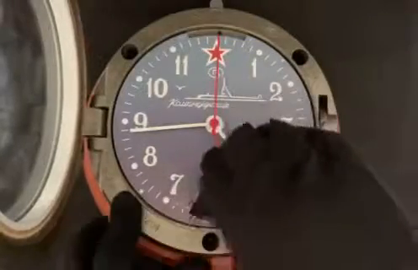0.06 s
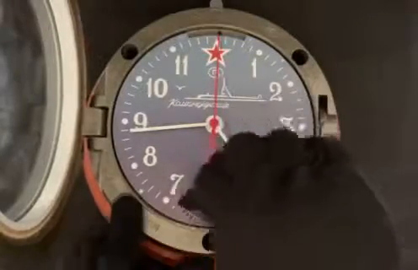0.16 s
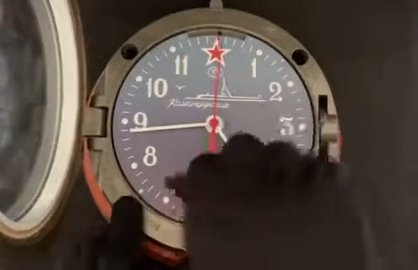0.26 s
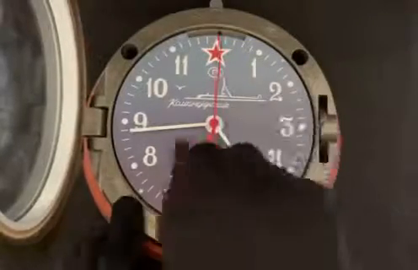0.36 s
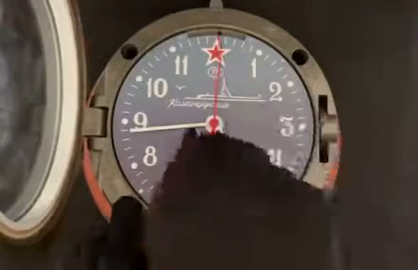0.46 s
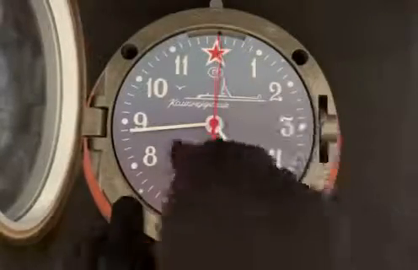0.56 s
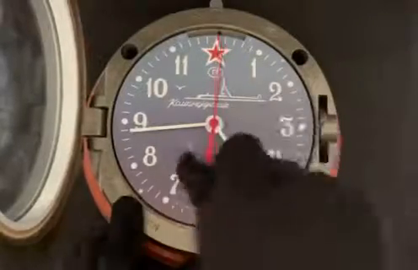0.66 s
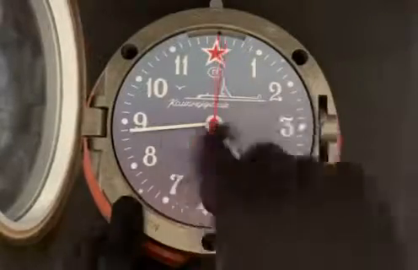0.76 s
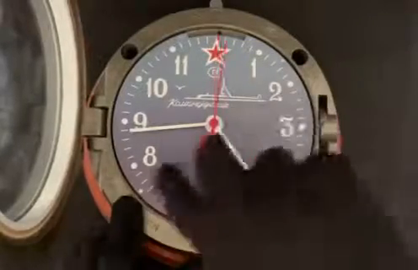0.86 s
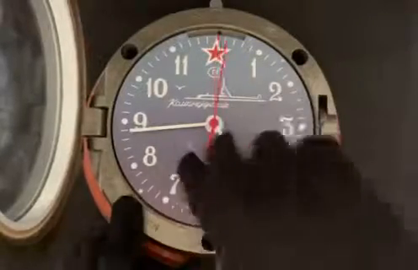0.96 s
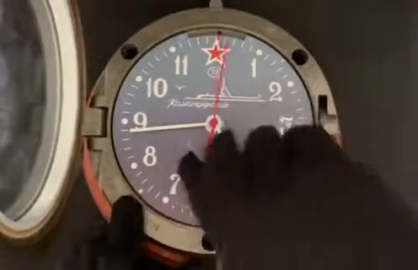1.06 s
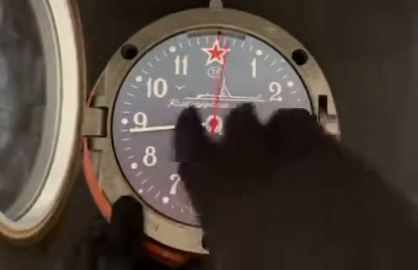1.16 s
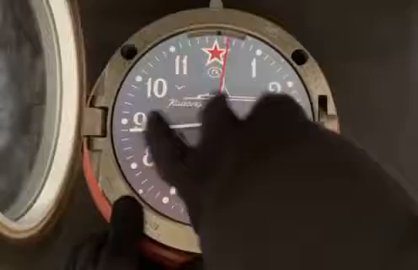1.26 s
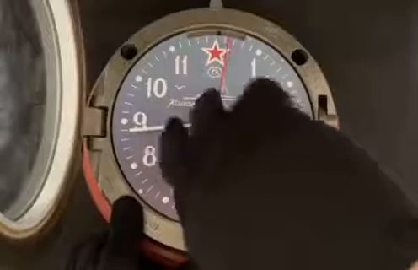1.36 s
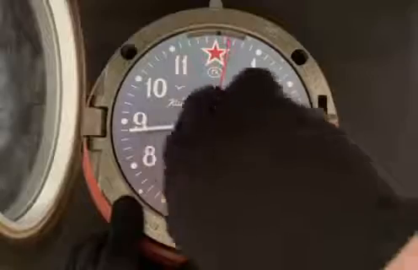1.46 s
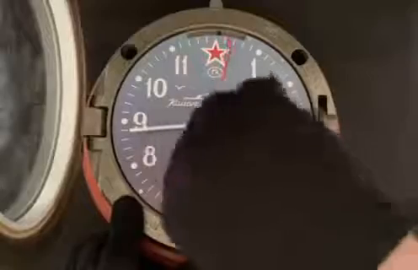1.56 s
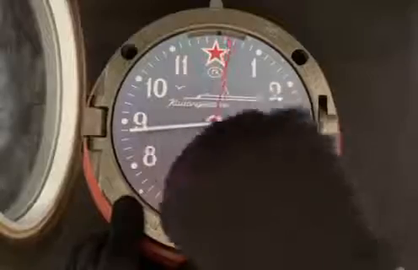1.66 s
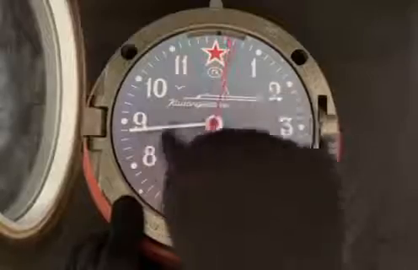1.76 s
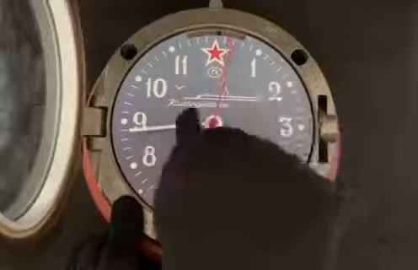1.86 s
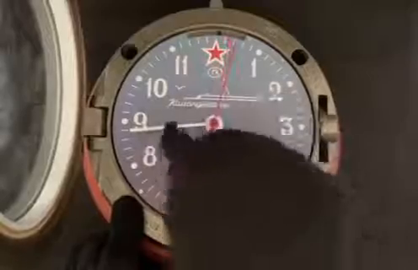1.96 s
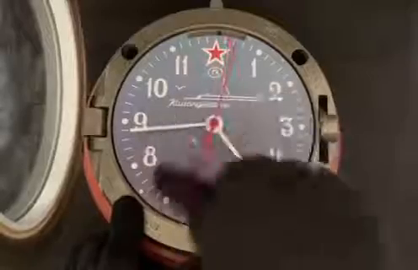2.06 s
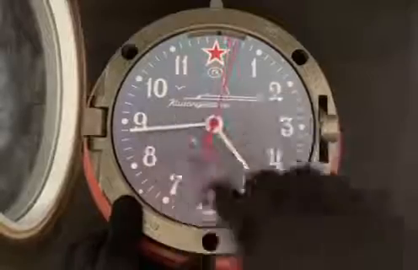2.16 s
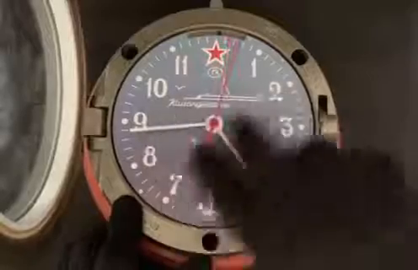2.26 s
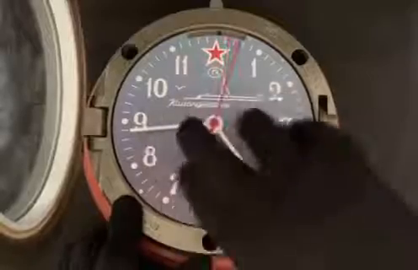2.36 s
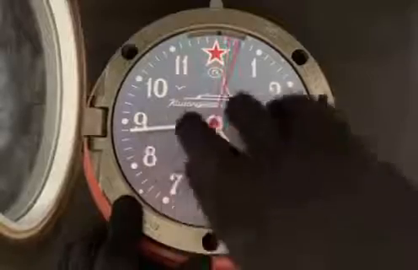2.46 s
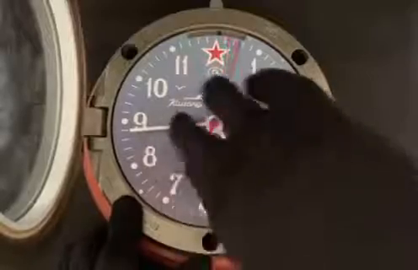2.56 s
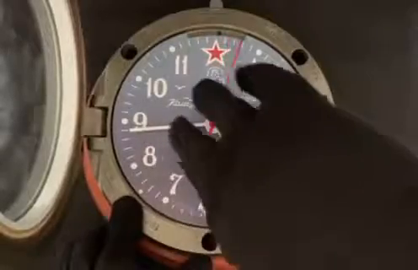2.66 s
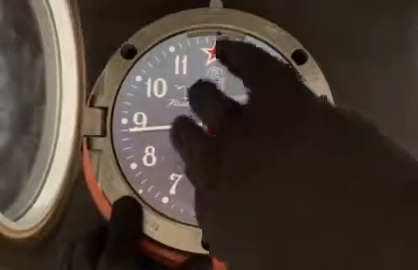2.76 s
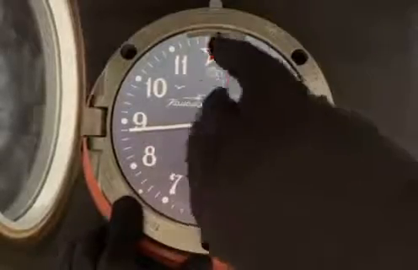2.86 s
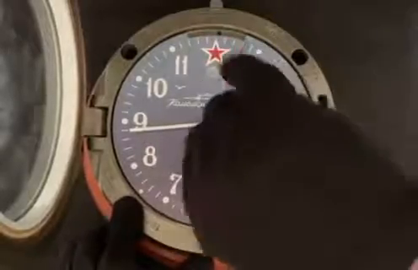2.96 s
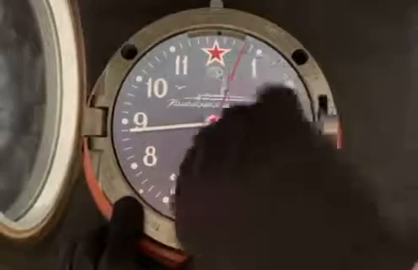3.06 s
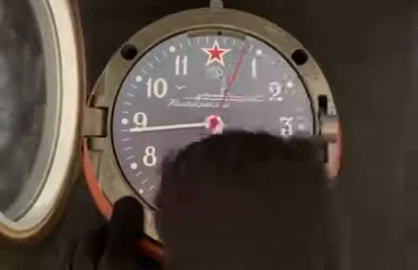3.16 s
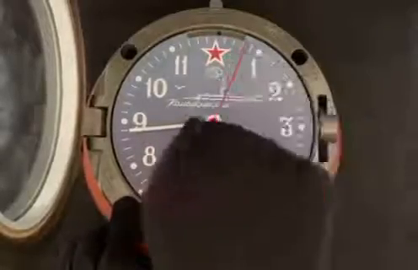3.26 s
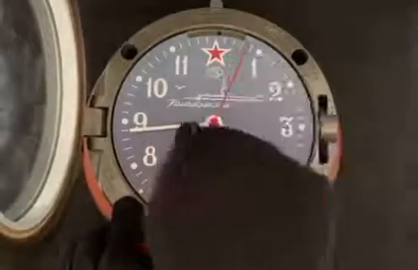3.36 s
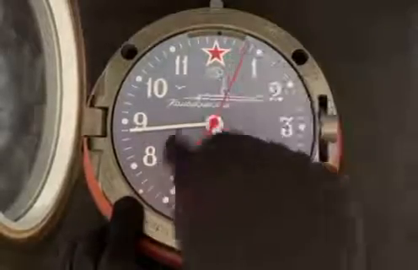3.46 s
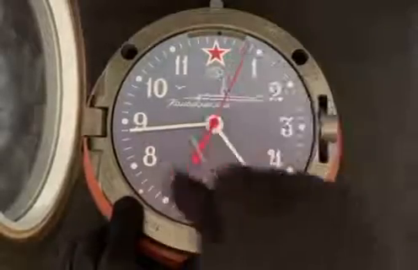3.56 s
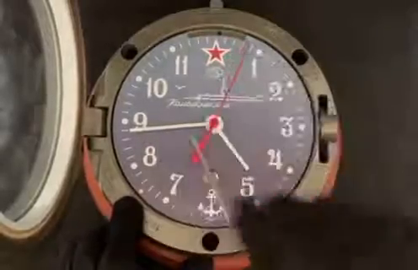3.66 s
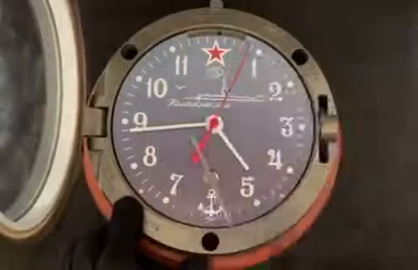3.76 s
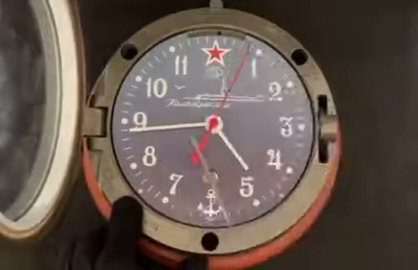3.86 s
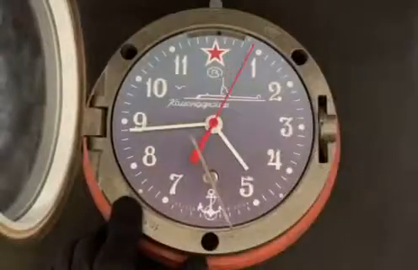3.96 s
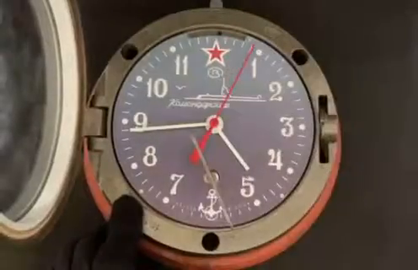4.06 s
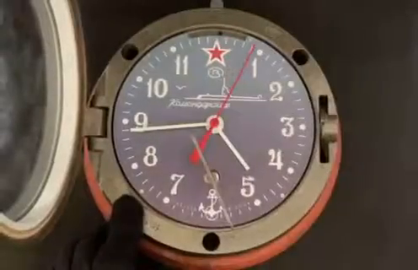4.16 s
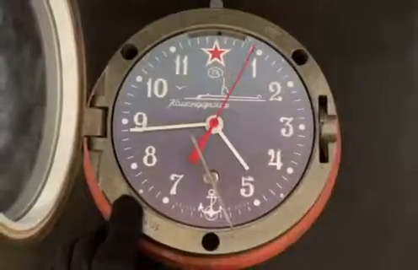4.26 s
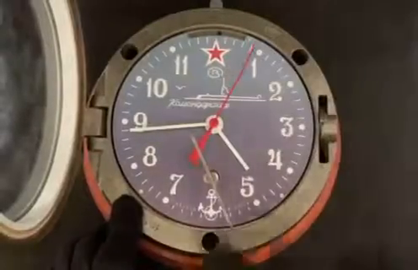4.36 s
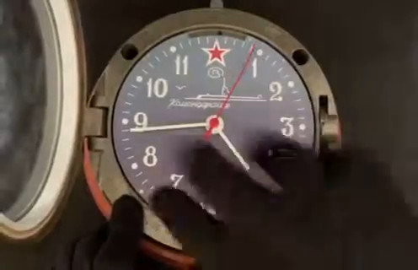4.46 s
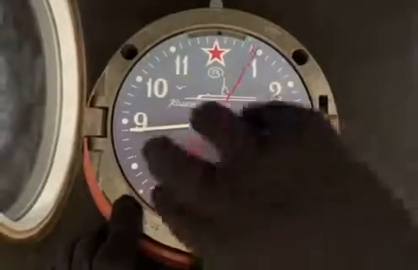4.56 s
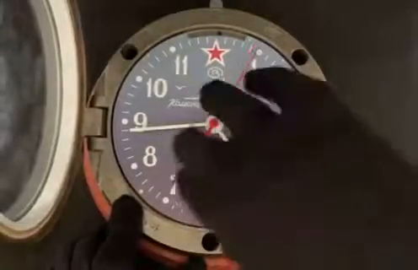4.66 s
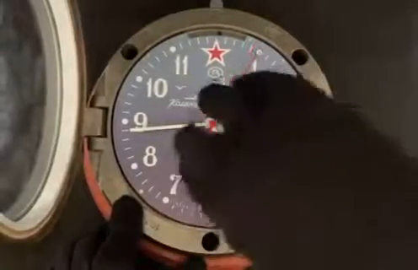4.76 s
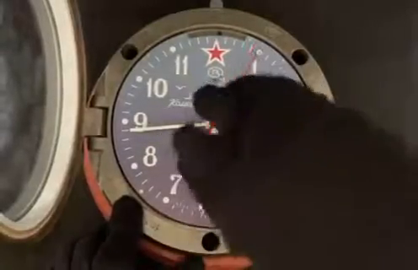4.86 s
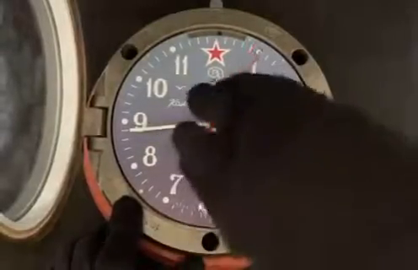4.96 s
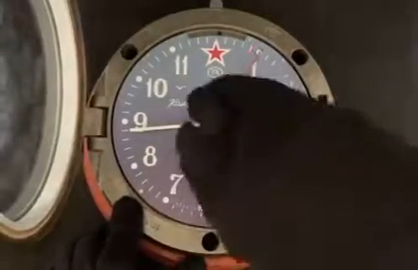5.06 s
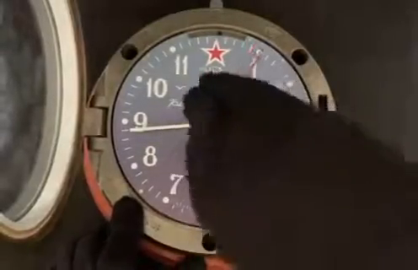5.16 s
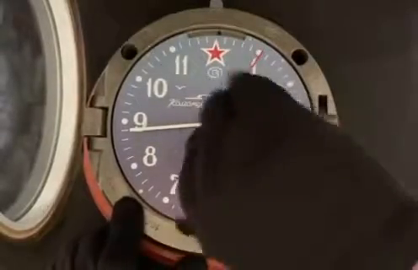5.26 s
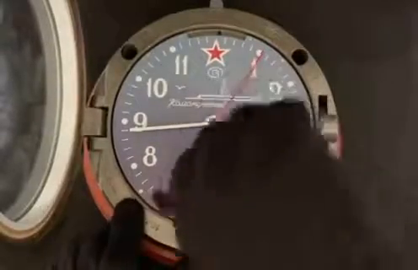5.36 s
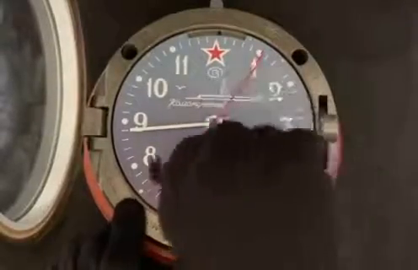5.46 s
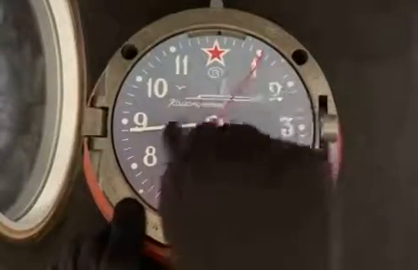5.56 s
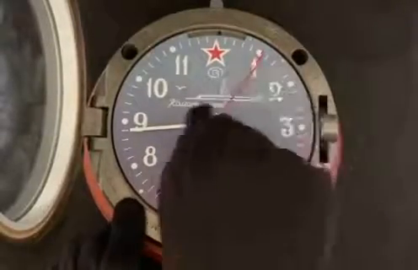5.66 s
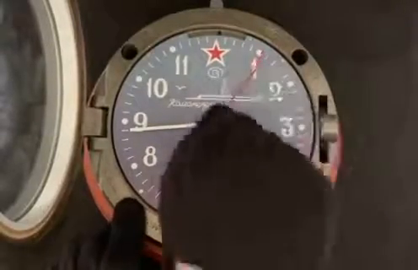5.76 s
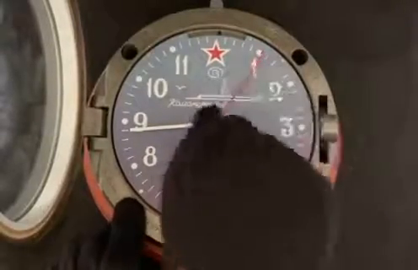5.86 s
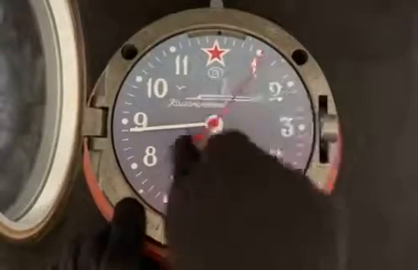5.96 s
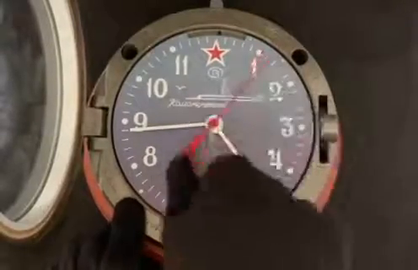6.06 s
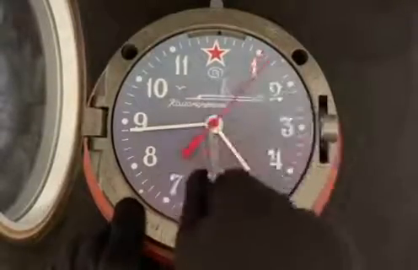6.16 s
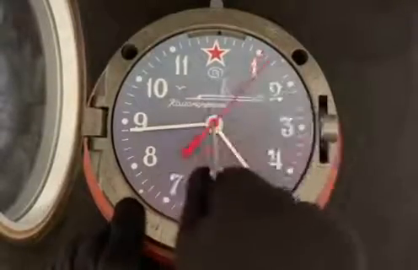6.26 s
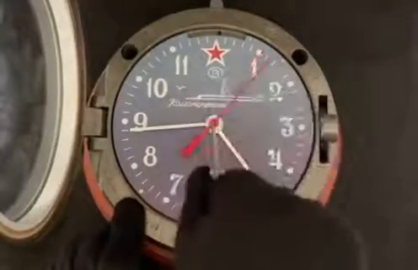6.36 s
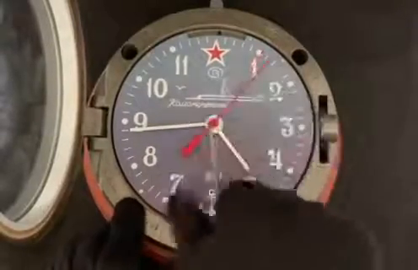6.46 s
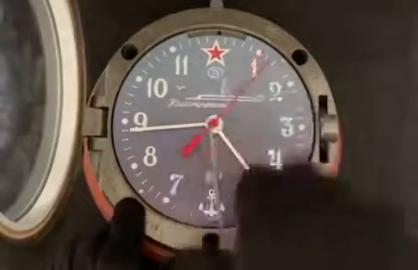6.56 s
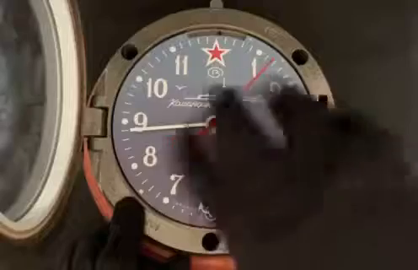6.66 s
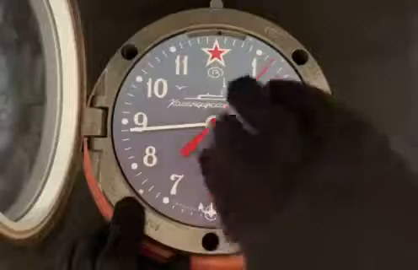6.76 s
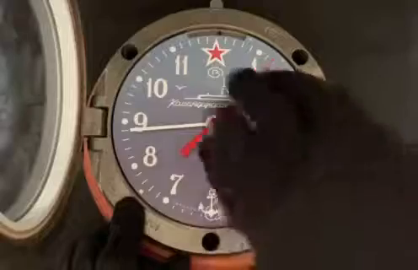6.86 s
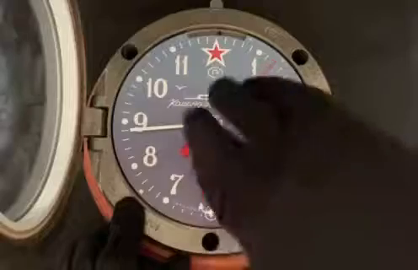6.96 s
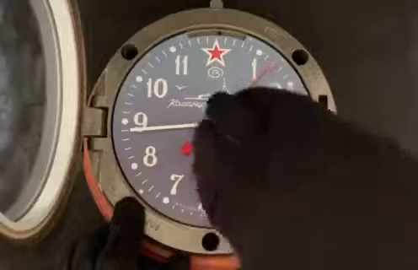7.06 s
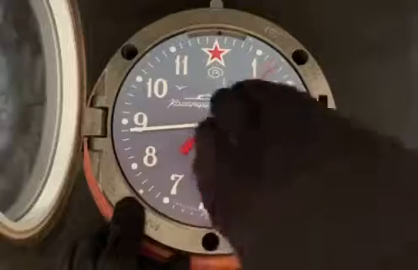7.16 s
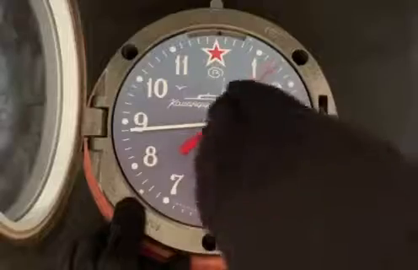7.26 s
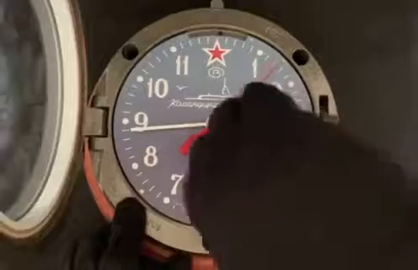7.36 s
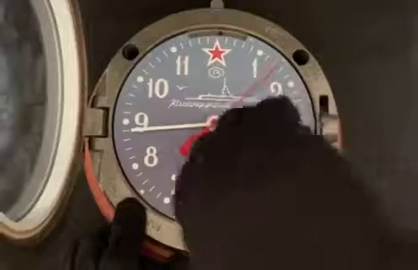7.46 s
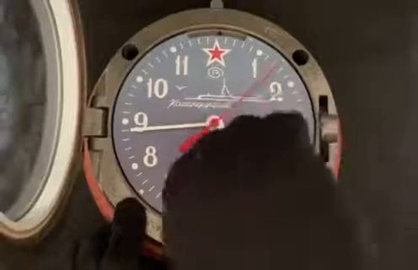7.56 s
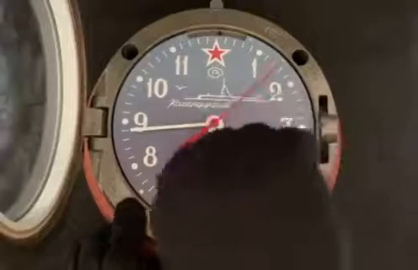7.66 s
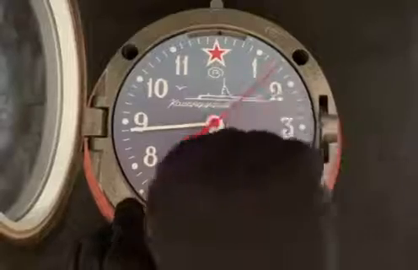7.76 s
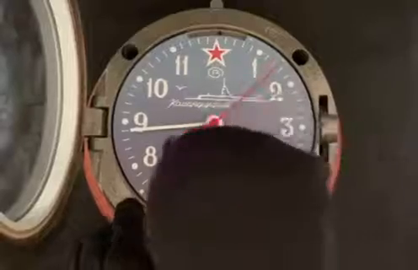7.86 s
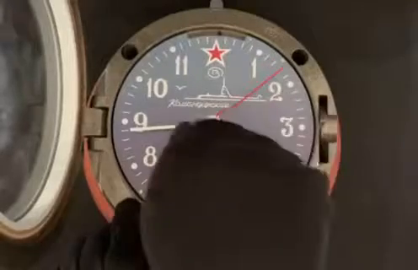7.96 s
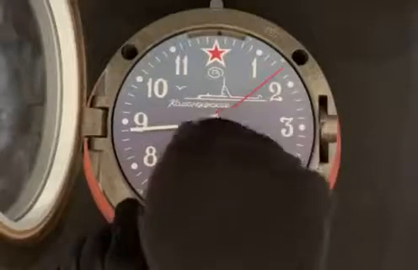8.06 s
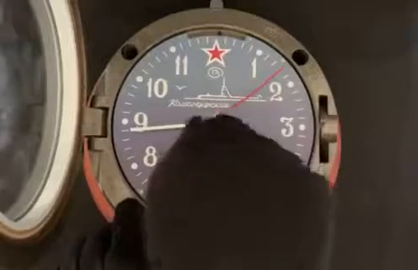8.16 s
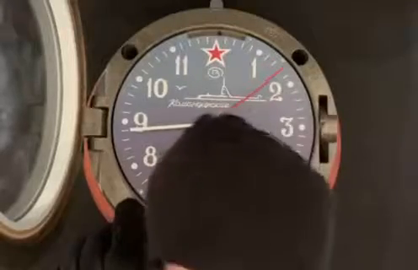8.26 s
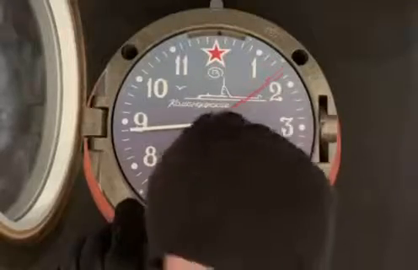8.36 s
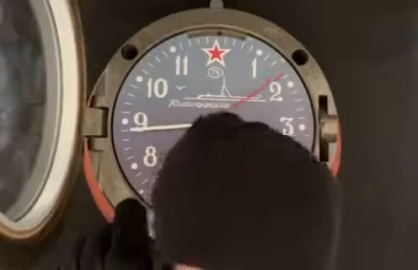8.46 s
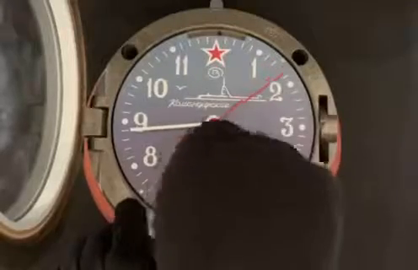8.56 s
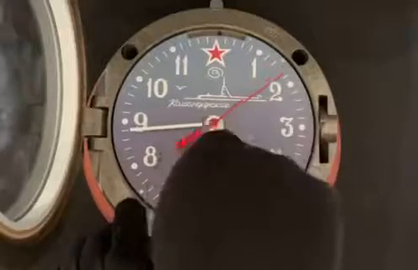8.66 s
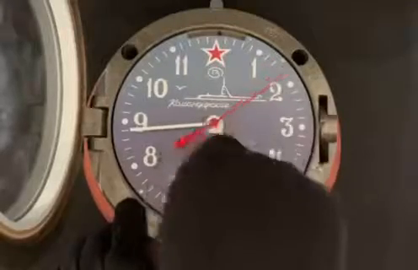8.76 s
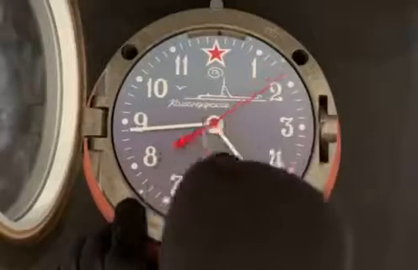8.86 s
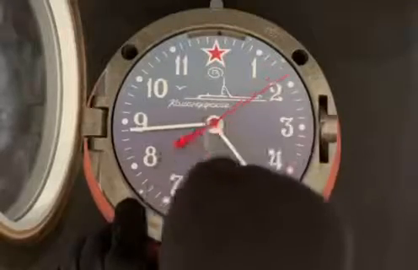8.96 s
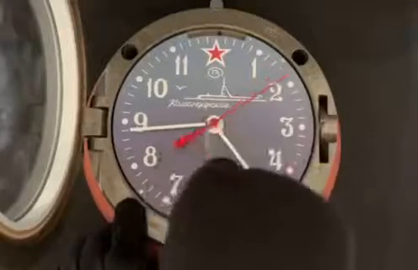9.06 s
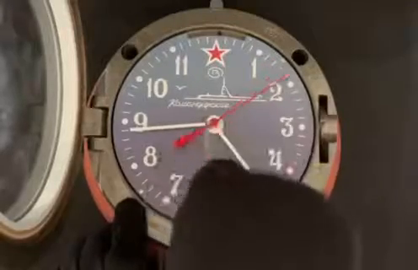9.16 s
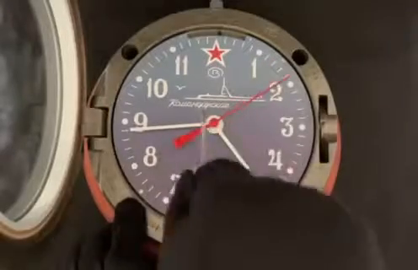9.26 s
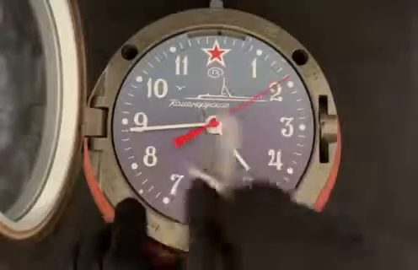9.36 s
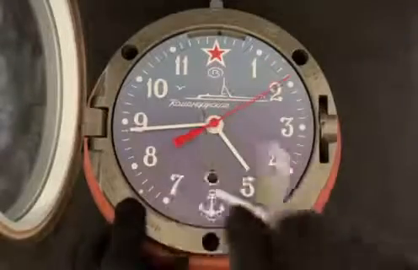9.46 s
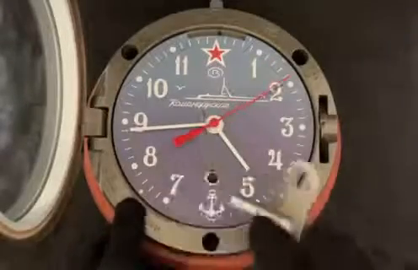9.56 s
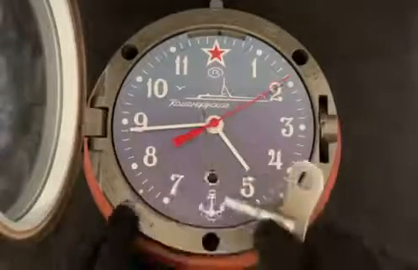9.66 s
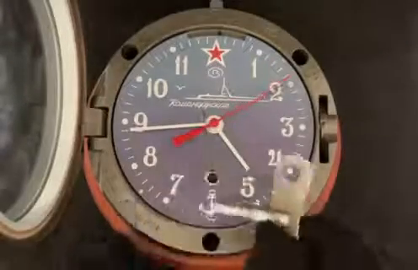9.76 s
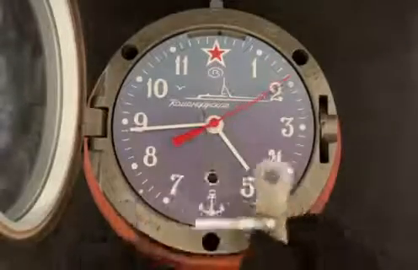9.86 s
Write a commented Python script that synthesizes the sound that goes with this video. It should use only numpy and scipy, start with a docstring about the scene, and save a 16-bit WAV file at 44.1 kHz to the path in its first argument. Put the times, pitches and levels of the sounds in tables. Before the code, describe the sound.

A key winds a mechanical clock in five fast bursts of crisp metallic ratchet clicks, with dull case knocks and faint ticking between them.

```python
"""On a table in a rumbling room, a gloved hand winds a wall clock in a heavy metal case with a key.
The pawl snaps over the ratchet teeth in five turns; key and hand knock between them. Below, the
escapement beats faintly five times a second. Blows are bursts of tiny random touches or a soft push
that ring the clock's modes; scrape, glove and rumble are shaped noise with moving gains. Near
reflections, case and walls add short tails, and two microphone ports hear it all in stereo."""
import sys
import numpy as np
from scipy import signal
from scipy.fft import rfft, irfft, next_fast_len
from scipy.io import wavfile
from scipy.ndimage import uniform_filter1d

SR = 44100
rng = np.random.default_rng(int(sys.argv[2]) if len(sys.argv) > 2 else 0)


def put_to_file(sound):
    """Save the sound as 16-bit audio at rate SR, in the file named by the first command-line argument."""
    columns = np.atleast_2d(sound).T  # one column per channel
    safe = np.clip(columns, -1, 1)
    whole_steps = np.round(safe * 32767)
    wavfile.write(sys.argv[1], SR, whole_steps.astype(np.int16))


N = 437021  # length in samples

# Pawl drops off a tooth: t/s, level/dB of the 6.8-9 kHz part, then level/dB against it of dial, bezel,
# plates, wheels, pawl spring; rattle length/ms, rebound delay/ms, rebound level/dB, lead-in level/dB
TEETH = [(0.11, -10.5, -25.5, -16.5, -13.5, -13, -0.5, 5.1, 7.4, -16, -27.5),
         (0.1745, -9.5, -23.0, -19.5, -11.5, -8.5, 3.5, 2.3, 6.4, -8.5, -35.5),
         (0.2314, -8.5, -27.5, -21, -25.5, -7, -6, 5.2, 5.3, -10, -43),
         (0.278, -9.5, -29, -20, -14.5, -21, -9.5, 4.4, 15, -16, -36.5),
         (0.3077, -12, -21, -22, -18, -11, -0.5, 4.6, 8.8, -10.5, -31.5),
         (0.3385, -13, -20.5, -17.0, -25.5, -22.0, -1.5, 2.5, 4.4, -6, -33),
         (0.3738, -9.5, -27.5, -21, -20, -8.5, -6, 3.6, 12, -18, -32.5),
         (1.4601, -9, -23, -18.5, -13, -9.5, -3.5, 4.7, 5.2, -19, -32.5),
         (1.4987, -10.5, -27.0, -16, -11.5, -6.5, 0.5, 2.1, 6.2, 0, -48),
         (1.5406, -10.5, -32, -17.5, -16, -22.0, 1, 2.1, 5.8, -6, -31),
         (1.5796, -10.5, -30, -20, -14.5, -15.5, -0.5, 3.4, 9.3, -6, -36),
         (1.6224, -8.5, -26.5, -22, -16.5, -21.5, -0.5, 2.7, 3.1, -4, -52.5),
         (1.6597, -11.5, -24.0, -14.5, -15.5, -16, -4.5, 2.9, 9.8, -13.5, -17.5),
         (1.6903, -10.5, -23.5, -20.5, -11.5, -23.5, -2.5, 5.0, 3.5, -8, -39),
         (1.7146, -18, -16, -13, -7, 6.5, 2.5, 3.9, 12, -2, -21),
         (1.7368, -16.5, -17, -17.5, -17.5, -4.5, 2.0, 5.1, 6.9, -7, -17),
         (1.76, -10.5, -26, -18.5, -12, -19, -5, 3.9, 4.9, -9, -25),
         (1.79, -13, -25.5, -19.5, -19.5, -13.5, -5.0, 3.6, 8.2, -9, -32.5),
         (2.8245, -8.5, -25.5, -20.5, -14.5, -8.5, 3, 2.9, 7.4, -5.5, -40),
         (2.8632, -14, -22, -12.5, -17.5, -6, 4, 6.3, 8.3, -16, -22),
         (2.9077, -11.5, -24.5, -18, -22, -26.5, 0.5, 3.3, 6.4, -18.5, -31.5),
         (2.9552, -11.5, -29, -19.5, -15, -15, -2.5, 4.8, 11, -12, -44),
         (3.011, -14.5, -23.5, -15, -11.5, -10.5, 1, 7.3, 4.1, -15, -32.5),
         (3.0523, -14.5, -23, -17.5, -15.5, -6, 0, 6.7, 4, -2, -17.5),
         (3.0864, -12.5, -34.5, -13.0, -10, -21.0, -8.5, 3.7, 5.6, -9.5, -28.5),
         (3.1108, -14, -22, -14.5, -22.5, -5.0, -0.0, 2.0, 9.1, -10.5, -18),
         (3.1291, -10, -34, -17.5, -10.5, -10, -8.5, 5.9, 4.1, -2.5, -27.5),
         (3.1534, -7.5, -25.5, -27, -19.5, -15.5, -10.5, 5.6, 11, -22.5, -26.5),
         (3.1804, -15.5, -24.5, -17, -18, -2.5, -3, 4.8, 13.8, -21, -19),
         (3.224, -18, -23, -13, -12.5, -4.5, 3, 2.7, 7.4, -10.5, -36.5),
         (5.1499, -10, -28.5, -17.5, -14, -4, 1.5, 1.8, 7.6, -11, -46.5),
         (5.1991, -13.5, -22.5, -15.5, -14, -4.5, 4, 3.8, 10, -14.5, -33.5),
         (5.254, -8.5, -29.5, -20.5, -13, -31, -1.5, 4.5, 12, -15, -52.5),
         (5.2961, -10, -27.5, -22, -16.5, -10, -2.5, 6.5, 3.5, -5.5, -37.5),
         (5.341, -12.5, -26.5, -15.5, -17, -11, 0, 4.6, 10.6, -10, -28),
         (5.3917, -10.5, -26, -17, -12.5, -12.5, 0, 3.7, 6.2, -6.5, -43.5),
         (5.4398, -10.5, -28, -17, -17.0, -12, -1.5, 4.1, 8.6, -16, -44),
         (5.4835, -18.5, -18, -9.5, -9.5, -16.5, 4.5, 6.2, 5.5, -9.5, -28.5),
         (5.5218, -12.5, -21, -17.5, -12, -12.5, 1, 5.2, 2.2, -14, -38.5),
         (5.5587, -13.5, -24, -15, -17, -2, 1, 6.0, 5.9, -18, -17),
         (5.6213, -11, -24, -15, -15.5, -12.5, -0.0, 4.0, 4.6, -12, -25),
         (5.7132, -13, -29.5, -15, -19, -8.5, 5.5, 3.7, 5.7, -10, -35),
         (7.2987, -15, -21.5, -17, -11, -9, 1.5, 4.3, 7.8, -17, -35),
         (7.3631, -15, -22.5, -15.5, -11.5, -2, 3.5, 5.2, 3.5, -6, -28),
         (7.4286, -12.5, -23, -16, -13.5, -14.5, 1.5, 3.7, 4.7, -9.5, -36),
         (7.5007, -13, -28.5, -16.5, -20, -7, 3.5, 3.6, 6.0, -12, -44.5),
         (7.5762, -9.5, -30.5, -19, -12, -9, -4, 1.6, 9.6, -14.5, -37),
         (7.6598, -12.5, -23.5, -20.5, -19.5, -4.5, 2, 4.1, 5.5, -13, -34),
         (7.75, -9, -31.0, -18.5, -17, -11, -5, 3.6, 5.2, -6, -33.5),
         (7.8224, -7.5, -29, -19.5, -18.0, -15, -2.5, 2.3, 7.8, -16.5, -32.5),
         (7.8952, -10, -24.5, -25.5, -22, -32.5, -1.5, 3.7, 7.2, -3, -43),
         (8.1071, -12.5, -23.5, -14, -12, -16, -1, 3.1, 4.9, -15.5, -32.5),
         (8.2469, -14.5, -25, -14, -19.5, 0, 2.5, 3.7, 4.4, -16, -26)]
# Small clicks of the key and of the hand's first contact: t/s, level/dB of the 6.8-9 kHz part,
# extra ring/dB before KEY_FOLLOWS, rattle length/ms
KEY = [(0.4896, -35.5, -3, 13), (0.5173, -38.5, 7.5, 4.4), (0.744, -71.5, 22, 8.8), (0.903, -53, 20.5, 8),
       (0.9142, -42.5, 16.5, 4.3), (1.3732, -60, 11.5, 11), (1.3896, -50.5, 2.5, 9.1),
       (1.913, -30.5, -1, 3.3), (2.197, -63.5, 23.5, 6), (2.362, -67, 15.5, 8.8), (2.757, -54, 0, 10),
       (3.3045, -48.5, -10, 6.9), (4.607, -80, 30, 6), (5.089, -41.5, -2.5, 2.1), (5.8096, -37, -3, 4.6),
       (6.7197, -48, 14, 6.6), (7.2024, -42.5, -5.5, 5.1), (8.2386, -44, -10, 9), (8.3633, -35, -7, 3.5)]
# Edges of the parts, f/Hz: case, dial, bezel, plates, wheels, reference steel, pawl spring
TOOTH_PARTS_HZ = [380, 700, 1800, 3000, 4800, 6800, 9000, 12500]
TOOTH_CASE_DB, TOOTH_SHIVER_DB = -31, -45   # case against the reference part; shiver after the blow
# The next two settings run over case, dial, bezel, plates, wheels, pawl spring
KEY_COLOUR_DB, KEY_SHIVER_DB = (-38, -13, -9, -10, -3, -3.5), -21
KEY_FOLLOWS = (.3, 1.2, .95, 1, 0.4, .05)   # share of the extra ring that each part takes
USUAL_BOUNCE = (2, -8.5, -30)   # small clicks and escapement: rebound delay ms, rebound dB, lead-in dB
SHIVER_S = .033   # fading time of the loose wheels


def ratchet():
    """The pawl rings the steel; the small clicks, held in the glove, thud more than they ring."""
    teeth = [(s, peak_db, TOOTH_CASE_DB, *rest, TOOTH_SHIVER_DB) for s, peak_db, *rest in TEETH]
    out = 0
    for rows, damping in [(teeth, 1.6), (small_clicks(), 3.5)]:
        forces = rattle(rows, per_s=14000, tail_s=SHIVER_S)
        out = out + blows(rows, TOOTH_PARTS_HZ, forces, LEAD_S, damping, crack_db=12, spread_db=3)
    return out


def small_clicks():
    """Small clicks spelt out part by part: the usual colour plus each part's share of the extra ring."""
    s, peak_db, ring_db, length_ms = np.transpose(KEY)[:, :, None]
    parts_db = np.array(KEY_COLOUR_DB) + np.array(KEY_FOLLOWS) * ring_db
    bounce = np.array(USUAL_BOUNCE) + 0 * s
    return np.hstack([s, peak_db, parts_db, length_ms, bounce, KEY_SHIVER_DB + 0 * s])


LEAD_S = .014   # time kept before the hit for the lead-in
HIT_DB, HIT_S, LEAD_IN_S = 2, 0.0016, 0.0029   # hit over rattle; fading time of the hit, growth of the lead-in
RISE_S = .0012   # rise of hit and rebound
BODY_STRETCH, BODY_SHIVER_DB = 1.7, 10.5   # the body rattles longer than the steel and shivers more


def rattle(rows, per_s, tail_s):
    """Random touches swell briefly, hit hard, rebound once and shiver; a force for body and for steel."""
    t = np.arange(4600) / SR - LEAD_S
    after = np.maximum(t, 0)
    length_ms, delay_ms, rebound_db, lead_in_db, shiver_db = np.array(rows)[:, -5:].T[:, :, None]
    lengths = length_ms / 1000
    since = t - delay_ms / 1000

    chance, side, size = np.moveaxis(rng.random((len(rows), 3, len(t))), 1, 0)
    touches = (chance < per_s / SR) * np.sign(side - .5) * (.5 - np.log(size + 0.0029))

    hit = from_db(HIT_DB) * np.exp(-after / HIT_S)
    rebound_fade = np.exp(-np.maximum(since, 0) / (.5 * lengths))
    rebound = from_db(rebound_db + HIT_DB) * np.clip(since / RISE_S, 0, 1) * rebound_fade
    lead_in = from_db(lead_in_db + HIT_DB) * 2 * np.exp(t / LEAD_IN_S) * (t < 0)
    rise = np.minimum(after / RISE_S, 1) ** 2

    forces = []
    for stretch, extra_db in [(BODY_STRETCH, BODY_SHIVER_DB), (1, 0)]:
        fade = np.exp(-after / (stretch * lengths))
        shiver = from_db(shiver_db + extra_db) * np.exp(-after / tail_s)
        forces.append(touches * (lead_in + rebound + rise * (hit + fade + shiver)))
    return forces


# Modes of the metal case: f/Hz, width/Hz before damping, level/dB
CASE = [(188, 7, -4), (230, 14, -15), (262, 12, -15), (289, 9, -10), (386, 14, -30), (471, 9, -7),
        (553, 9, -5)]
# Modes of dial, bezel, plates, wheels and springs: f/Hz, width/Hz before damping, level/dB
MOVEMENT = [(757, 160, -29), (1106.6, 130, -24), (1371, 30, -19.5), (1506, 22, -6.5), (1700, 230, -24),
            (2269, 43, -20), (2262, 31, -7.5), (2180, 81, -20), (3213, 80, -20), (3986, 46, -10.5),
            (4450, 68, -17), (5990, 58, -19), (6280, 51, -14.5), (6240, 210, -19), (3050, 57, -21.5),
            (4200, 83, -29), (7450, 90, -13), (8025, 90, 4), (8700, 600, 4.5), (7990, 50, -3),
            (8774, 120, -9.5), (9760, 40, -8), (9860, 190, -8), (10143, 100, -7), (10600, 38, -9),
            (10750, 130, 0.5), (11280, 40, -3), (11293, 170, -2.5)]
BODY_TOP_HZ = 4800   # parts below this are body, above it steel
CASE_DETUNE, BODY_DETUNE, STEEL_DETUNE = .01, .018, .004   # relative pitch spread from blow to blow
BODY_DAMPING, DAMPING_SPREAD_DB = 2.0, 1.5   # extra width factor of the body; chance in each mode's width


def blows(rows, parts_hz, forces, lead_s, damping, crack_db, spread_db):
    """Each force (one row a blow) rings every mode anew; each part is set to its own level."""
    rows = np.array(rows)
    modes = CASE + MOVEMENT
    reference = parts_hz.index(6800) if 6800 in parts_hz else 0
    against_db = np.insert(rows[:, 2:len(parts_hz)], reference, 0, axis=1)
    levels_db = rows[:, 1:2] + against_db

    # chance varies each mode's strength, pitch and damping from blow to blow
    shape = (len(rows), len(modes))
    strengths = from_db(spread_db * rng.standard_normal(shape))
    pitches = rng.standard_normal(shape)
    losses = from_db(DAMPING_SPREAD_DB * rng.standard_normal(shape))

    sound = 0
    for k, (low, high) in enumerate(zip(parts_hz, parts_hz[1:])):
        body = low < BODY_TOP_HZ
        force = forces[0 if body else 1]
        part = from_db(crack_db) * force   # bare contact noise beside the ringing
        for m, (hz, width_hz, mode_db) in enumerate(modes):
            if not low <= hz < high:
                continue
            detune = CASE_DETUNE if m < len(CASE) else BODY_DETUNE if body else STEEL_DETUNE
            mode_hz = hz * (1 + detune * pitches[:, m])
            widths = damping * losses[:, m] * BODY_DAMPING ** body * width_hz
            ringing = np.array([ring(*blow) for blow in zip(force, mode_hz, widths)])
            part = part + ringing * from_db(mode_db) * strengths[:, m:m + 1]
        part = signal.sosfilt(signal.butter(3, [low, high], "band", fs=SR, output="sos"), part)
        sound = sound + part / crest(part) * from_db(levels_db[:, k:k + 1])

    out = np.zeros(N + forces[0].shape[1])
    for s, one in zip(rows[:, 0], sound):
        start = round((s - lead_s) * SR)
        out[start:start + len(one)] += one
    return out[:N]


# Hand bumps the case: t/s, level/dB of the lowest group of case modes, level/dB against it of the
# second, third and fourth group; push length/ms
KNOCKS = [(0.521, -40.5, 7, -1.5, 5, 5.5), (0.601, -42.5, -4, -21, -24, 36), (0.678, -36, -9, -16, -26, 30),
          (0.754, -31, 3, -3.5, -13.5, 5.5), (0.872, -34, -1, -8.5, -12.5, 13),
          (0.892, -29, -5, -5, -7, 17), (0.915, -19, -2.5, -3.5, -7.5, 8),
          (0.934, -19, -9, -12.5, -16, 12.5), (1.023, -40, -8, -13.5, -18.5, 28),
          (1.816, -41.5, 2, -15.5, -10, 2.8), (1.921, -25, -4, -13, -7, 3.3),
          (2.202, -24.5, 0.5, -14.5, -11.5, 16.7), (2.377, -40, 6.5, 0.5, -6.5, 13),
          (2.475, -48.5, 1.5, -2, -4, 9.5), (3.072, -37.5, -2, -17.5, -6.5, 9.1),
          (3.313, -46.5, 4, 1, -8.5, 7), (3.489, -49, -7.5, -12, -5.5, 9),
          (4.608, -31.5, -7, -17.5, -11.5, 16), (4.65, -30.5, -3.5, -10.5, -17, 10.2),
          (5.328, -34, -2.5, -3, -11.5, 2.1), (5.815, -30.5, -1, -9.5, -6.5, 2.6),
          (5.864, -36, -8, -26.5, -28, 25), (5.941, -48.5, 9, 3, -5, 10.6),
          (6.396, -36, -2.5, -17, -14.5, 7.3), (6.727, -38, 4.5, 3, 5, 14.5),
          (8.366, -43, 1.5, -2, -2.5, 6.2), (8.466, -38.5, -13, -21.5, -24, 12),
          (8.507, -43.5, -2.5, -11, -20.5, 6.6), (8.704, -54.5, -1, -1, -9, 4.6),
          (8.815, -46.5, 0, -27, -20, 4.8), (9.082, -43, -6, -19, -29, 25),
          (9.119, -36, -3.5, -19.5, -17.5, 13.3)]
# Edges of the four groups of case modes and the dial, f/Hz
KNOCK_PARTS_HZ = [150, 240, 360, 500, 700, 1300]
KNOCK_DIAL_DB = -12   # dial against the fourth group
THUMP_DB, THUMP_S = -6.5, .0008   # first contact of the finger: height against the push, width


def knocks():
    """A padded finger lands, then pushes: a swelling, dull, uneven force that leaves the case ringing."""
    t = np.arange(7500) / SR
    lengths = np.array(KNOCKS)[:, -1:] / 1000
    uneven = rng.standard_normal((len(KNOCKS), len(t)))
    push = uneven * (t / lengths) ** 0.41 * np.exp(-t / lengths)
    thump = from_db(THUMP_DB) * np.exp(-((t - .003) / THUMP_S) ** 2)
    rows = [(*levels, levels[-1] + KNOCK_DIAL_DB) for *levels, length_ms in KNOCKS]
    return blows(rows, KNOCK_PARTS_HZ, [push + thump], .004, damping=1.15, crack_db=7, spread_db=2)


BEAT_S, SWING_S, RETURN = .279, .4, .465   # first beat, full swing, share of the swing at the return beat
TICK_DB, TOCK_DB = -61, -64.5   # 6.8-9 kHz part at mid-scene, before chance
DROP_S = .024   # from unlocking to the drop of the tock
BEAT_COLOUR_DB = (-28, -14, -13, -11, -5.5, -7.5)   # same parts as KEY_COLOUR_DB
BEAT_RATTLE_MS, BEAT_SHIVER_DB = 1.2, -8   # length on the steel; level of the shiver
BEAT_GROWTH_DB_PER_S = 0.5   # the beat hardens as the spring is wound


def escapement():
    """Tick and tock, no two alike; the tock unlocks a moment before it drops."""
    ticks = np.arange(BEAT_S, N / SR - .02, SWING_S)
    tocks = ticks[:-1] + RETURN * SWING_S
    beats = [(ticks, TICK_DB), (tocks, TOCK_DB), (tocks + DROP_S, TOCK_DB + 2.0)]
    blow = (*BEAT_COLOUR_DB, BEAT_RATTLE_MS, *USUAL_BOUNCE, BEAT_SHIVER_DB)
    rows = np.array([(s, level_db, *blow) for times, level_db in beats for s in times])
    growth_db = BEAT_GROWTH_DB_PER_S * (rows[:, 0] - N / SR / 2)
    rows[:, 1] += growth_db + 1.2 * rng.standard_normal(len(rows))
    forces = rattle(rows, per_s=3600, tail_s=0.02)
    return blows(rows, TOOTH_PARTS_HZ, forces, LEAD_S, damping=1.5, crack_db=18, spread_db=5)


# The key is under strain: t/s, length/s, level/dB of the grip on the case
TURNS = [(0.07, 0.4, -55.5), (1.415, 0.45, -53.5), (2.747, 0.58, -58.5), (5.106, 0.74, -57),
         (7.197, 0.753, -66), (8.071, 0.11, -63), (8.211, 0.082, -57)]
STRAIN_ATTACK_S, STRAIN_RELEASE_S = 0.032, 0.012
REST_GRIP_DB = -81.5
REGRIP_DB, REGRIP_S = -20, 0.012   # the case stays astir after a knock: level against it, fading time


def grip():
    """An uneven squeeze keeps the case modes astir, more so in each turn and after each knock."""
    squeeze = rng.standard_normal(N) * from_db(5.4 * drift(4.0))
    stirred = rms_one(sum(ring(squeeze, hz, width_hz) * from_db(mode_db) for hz, width_hz, mode_db in CASE))
    regrips = [(s, 0, peak_db + REGRIP_DB) for s, peak_db, *rest in KNOCKS]
    turn_gain = swells(TURNS, REST_GRIP_DB, STRAIN_ATTACK_S, STRAIN_RELEASE_S)
    regrip_gain = swells(regrips, REST_GRIP_DB, 0.0084, REGRIP_S)
    return np.hypot(turn_gain, regrip_gain) * stirred


def strain():
    """Gain of the winding force: near one while the key turns, almost nothing between."""
    turns = [(s, length, 0) for s, length, grip_db in TURNS]
    return swells(turns, -63, STRAIN_ATTACK_S, STRAIN_RELEASE_S)


# Short sliding and whirring swells, the late ones following escapement beats:
# t/s, length/s, swish level/dB, scrape level/dB
STROKES = [(-.06, 0.11, -57, -59), (0.509, 0.21, -68.5, -65.5), (0.74, 0.28, -68, -70.5),
           (0.988, 0.28, -71.5, -72), (2.041, 0.18, -63.5, -70.5), (2.256, 0.14, -58, -73.5),
           (3.417, 0.3, -72, -83), (3.87, 0.2, -70, -76), (4.093, 0.29, -68.5, -79),
           (4.605, 0.17, -73.5, -69), (4.88, 0.29, -75.5, -100), (5.88, 0.18, -96.5, -77),
           (6.302, 0.21, -84.5, -87), (6.63, 0.32, -83.5, -76), (7.924, 0.12, -86, -69),
           (8.147, 0.081, -85, -65), (8.28, 0.053, -71, -59), (8.448, 0.079, -70, -72.5),
           (8.682, 0.039, -80, -69.5), (8.866, 0.046, -83, -72), (9.091, 0.046, -65, -74),
           (9.258, 0.042, -66, -72), (9.484, 0.22, -74, -81.5), (9.853, 0.088, -74, -85)]
# Colour of the scrape: f/Hz, relative level/dB per Hz
SCRAPE = [(2940, -39), (4200, -8.5), (5300, -12), (6400, -5.5), (7680, -2.5), (8170, -5), (9380, -13.5),
          (11200, -9.5), (11600, -21), (12500, -46), (16200, -79), (22000, -120)]
STROKE_ATTACK_S, STROKE_RELEASE_S = 0.053, 0.015
TURN_SCRAPE_DB, REST_SCRAPE_DB = -61.5, -83.5
WHIRR_DB, WHIRR_S, WHIRR_RELEASE_S = -78.5, 0.047, .025   # wheel train after each beat


def scrape():
    """Bright grit swells in the turns and strokes, and the wheel train runs on after each beat."""
    stroke_gain = swells(np.array(STROKES)[:, [0, 1, 3]], REST_SCRAPE_DB, STROKE_ATTACK_S, STROKE_RELEASE_S)
    swings = np.arange(BEAT_S, N / SR, SWING_S)
    beats = [(s + share * SWING_S, WHIRR_S, WHIRR_DB) for s in swings for share in (0, RETURN)]
    whirr_gain = swells(beats, -100, .012, WHIRR_RELEASE_S)
    turn_gain = from_db(TURN_SCRAPE_DB) * strain()
    gain = np.sqrt(turn_gain ** 2 + stroke_gain ** 2 + whirr_gain ** 2)
    return gain * coloured(SCRAPE, grit(12000), patchy_db=2.5) * from_db(1.3 * drift(8))


# Colour of the soft sliding: f/Hz, relative level/dB per Hz
SWISH = [(380, -50), (650, -14.5), (1190, -7), (1320, -1.5), (1770, -12.5), (2220, -10.5), (2650, -19.5),
         (3340, -15), (5570, -28.5), (6000, -23.5), (7800, -53), (13200, -120)]


def swish():
    """Soft sliding: smooth noise swells with each stroke."""
    gain = swells(np.array(STROKES)[:, [0, 1, 2]], -95, STROKE_ATTACK_S, STROKE_RELEASE_S)
    noise = coloured(SWISH, rng.standard_normal(N), patchy_db=3.5)
    return gain * noise * from_db(2.5 * drift(9.0))


# Colour of the rubbing glove: f/Hz, relative level/dB per Hz
RUSTLE = [(350, -40.5), (600, -14.5), (680, -19.5), (801, -4.5), (1200, -11), (1530, 1.5), (1800, -14.5),
          (2270, -10.5), (3600, -6.5), (6000, -14), (7800, -51.5), (13200, -120)]
TURN_RUSTLE_DB, REST_RUSTLE_DB = -62.5, -79


def rustle():
    """The glove rubs: coarse grit grows with the strain over a wavering resting level."""
    gain = np.hypot(from_db(TURN_RUSTLE_DB) * strain(), from_db(REST_RUSTLE_DB + 2.5 * drift(1.3)))
    return gain * coloured(RUSTLE, grit(8000), patchy_db=4.5) * from_db(1.4 * drift(25))


# The hand's weight shifts and the table booms: t/s, length/s, level/dB
BOOMS = [(.55, 0.089, -54), (.9, .1, -57), (1.22, 0.13, -56), (1.55, .1, -65), (1.88, 0.11, -55.5),
         (2.25, 0.16, -70.5), (2.9, 0.43, -68), (5.25, 0.16, -58), (5.7, 0.15, -64.5), (6.75, 0.1, -66),
         (8.3, 0.16, -65.5), (9.08, 0.092, -67)]
BOOM_ATTACK_S, BOOM_RELEASE_S = 0.039, 0.2
TABLE_HZ, REST_RUMBLE_DB = 62, -75


def rumble():
    """Noise through two resonances at one pitch makes the table boom."""
    narrow = ring(rng.standard_normal(N), TABLE_HZ, 3.0)
    boom = rms_one(ring(narrow, TABLE_HZ, 28))
    return swells(BOOMS, REST_RUMBLE_DB, BOOM_ATTACK_S, BOOM_RELEASE_S) * boom


# Colour of the room's rumble: f/Hz, relative level/dB per Hz
ROOM = [(15, -43.5), (25, -12), (81, -14), (119, 2.5), (149, 0), (201, -1), (241, -5.5), (297, -5),
        (355, -14), (541, -18), (647, -43), (810, -17.5), (900, -46), (1170, -63.5), (1980, -120)]
ROOM_DB = -61.5   # shared noise; each port's own noise lies 6.5 dB lower


def room():
    """Low noise, partly shared by the ports and partly each port's own."""
    shared, left, right = [coloured(ROOM, rng.standard_normal(N), patchy_db=4.0) for _ in range(3)]
    return from_db(ROOM_DB) * (ports(shared) + from_db(-6.5) * np.array([left, right]))


EARLY_DB, EARLY_T60_S = -6, .016   # near reflections
CAVITY_DB, CAVITY_T60_S = -6, 0.081   # the open case echoes the middle range
WALL_DB, WALL_T60_S, WALL_CUT_HZ = -22, 0.082, 4000


def surroundings(clock):
    """The moving hand trades one set of near reflections for another; case and walls echo longer."""
    shade = 2.34 * drift(2.8)   # mixing angle in radians
    first, second = reflections(clock, EARLY_T60_S), reflections(clock, EARLY_T60_S)
    early = np.cos(shade) * first + np.sin(shade) * second
    cavity = reflections(clock, CAVITY_T60_S, BODY_TOP_HZ)
    walls = reflections(clock, WALL_T60_S, WALL_CUT_HZ)
    return from_db(EARLY_DB) * early + from_db(CAVITY_DB) * cavity + from_db(WALL_DB) * walls


def reflections(x, t60, top_hz=16000):
    """A short dense noise tail without bass, a different one to each port."""
    t = np.arange(int(t60 * SR)) / SR
    tails = rng.standard_normal((2, len(t))) * from_db(-60 * t / t60) * (t > .001)
    tails = tails / np.sqrt(np.sum(tails[0] ** 2))
    thin = signal.sosfilt(signal.butter(2, [350, top_hz], "band", fs=SR, output="sos"), x)
    return signal.fftconvolve(thin[None], tails, axes=1)[:, :N]


# Phase step between the ports: f/Hz, lead of the left/rad
PORT_PHASE = [(30, 0), (188, -.5), (470, -1.3), (560, -.6), (1100, .2), (2500, .4), (3000, 2.3),
              (4200, 2.2), (4600, 3.1), (5700, 3.2), (6350, 4.4), (6600, 5.9), (8000, 6.28), (9500, 6.4),
              (10100, 7.3), (10800, 8.5), (12000, 9.4), (13000, 9.6)]
# Level step between the ports: f/Hz, level/dB of left over right
PORT_BALANCE = [(60, 0), (150, -3), (250, -1), (300, -3), (470, -3), (554, -7), (800, -1.5), (1900, -2),
                (2300, -7), (2700, -3), (3500, 0), (3900, -3), (4500, 0), (13000, 0)]


def ports(x):
    """Two microphone ports hear a sound with a phase and level step that depends on pitch."""
    size = next_fast_len(N + SR)
    hz = np.arange(size // 2 + 1) * SR / size
    step = from_db(at_hz(PORT_BALANCE, hz) / 2) * np.exp(.5j * at_hz(PORT_PHASE, hz))
    return irfft(rfft(x, size) * np.array([step, 1 / step]), size)[:, :N]


def ring(force, hz, width_hz):
    """A resonance: a unit click sets a decaying sine of height 1 ringing."""
    r, w = np.exp(-np.pi * width_hz / SR), 2 * np.pi * hz / SR
    return signal.lfilter([0, np.sin(w)], [1, -2 * r * np.cos(w), r * r], force + 1e-18)


def crest(rows):
    """Height of each row's loudest three milliseconds, taken as twice their rms."""
    return 2 * np.sqrt(uniform_filter1d(rows ** 2, size=130, axis=1).max(axis=1, keepdims=True))


PATCH_HZ = 14   # rate at which the octaves waver


def coloured(spectrum, source, patchy_db):
    """A source shaped to a spectrum; each octave swells and fades on its own; rms 1."""
    size = next_fast_len(N)
    hz = np.arange(size // 2 + 1) * SR / size
    shaped = rfft(source, size) * from_db(at_hz(spectrum, hz))
    octaves, out = np.log2(hz + 1), 0
    for centre in np.arange(np.log2(spectrum[1][0]) - 1, np.log2(spectrum[-2][0]) + 1):
        share = np.clip(1 - np.abs(octaves - centre), 0, 1)
        out = out + irfft(shaped * share, size)[:N] * from_db(patchy_db * drift(PATCH_HZ))
    return rms_one(out)


def grit(per_s):
    """Random small touches of uneven size."""
    return (rng.random(N) < per_s / SR) * rng.standard_normal(N) * (1.7 + rng.exponential(1, N))


def swells(rows, rest_db, attack_s, release_s):
    """Gain in time: each (start s, length s, dB) rises, holds and dies away over a resting level."""
    t = np.arange(0, N + 100, 100) / SR
    start, length, level_db = np.transpose(rows)[:, :, None]
    shape = np.clip((t - start) / attack_s, 0, 1) * np.exp(-np.maximum(t - start - length, 0) / release_s)
    power = from_db(rest_db) ** 2 + np.sum((from_db(level_db) * shape) ** 2, axis=0)
    return np.interp(np.arange(N) / SR, t, np.sqrt(power))


def drift(rate):
    """Slow chance with spread 1: low-passed noise drawn every 40 samples."""
    r = np.exp(-80 * np.pi * rate / SR)
    noise = rng.standard_normal(N // 40 + 2002)
    slow = signal.lfilter([1], [1, -2 * r, r * r], noise)[2000:]   # settled part only
    return np.interp(np.arange(N) / 40, np.arange(len(slow)), rms_one(slow))


def at_hz(points, hz):
    """Table read on a log-frequency axis."""
    table = np.array(points)
    return np.interp(np.log(hz + 1), np.log(table[:, 0] + 1), table[:, 1])


def from_db(db):
    """Gain of a level."""
    return 10 ** (np.asarray(db) / 20)


def rms_one(x):
    """Scaled to rms 1."""
    return x / np.sqrt(np.mean(x ** 2) + 1e-20)


def scene():
    """Clock, hand and room at the two ports."""
    hand = grip() + scrape() + swish() + rustle() + rumble()
    clock = ratchet() + knocks() + escapement() + hand
    return ports(clock) + surroundings(clock) + room()


def record(dry):
    """Peaks are rounded, the treble rolls off, then the top is cut."""
    rounded = .7 * np.tanh(dry / .7)
    dulled = signal.sosfilt(signal.butter(4, 11800, fs=SR, output="sos"), rounded)
    return signal.sosfilt(signal.butter(8, 12683, fs=SR, output="sos"), dulled)


dry = scene()
out = record(dry)
put_to_file(out)
```